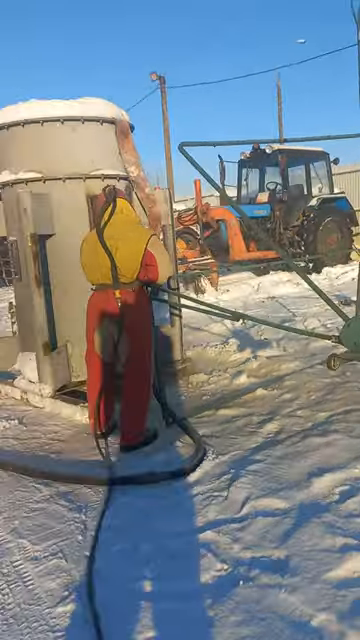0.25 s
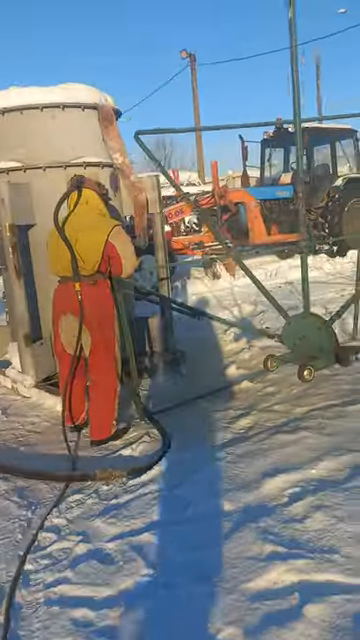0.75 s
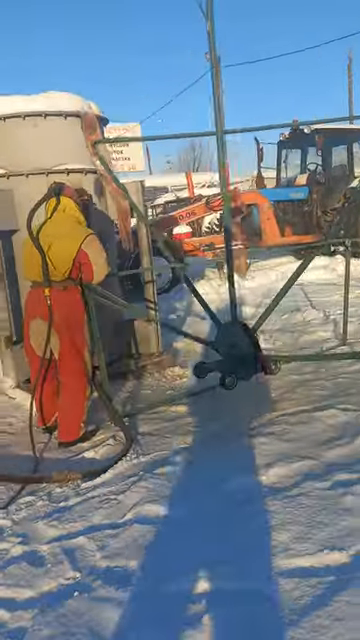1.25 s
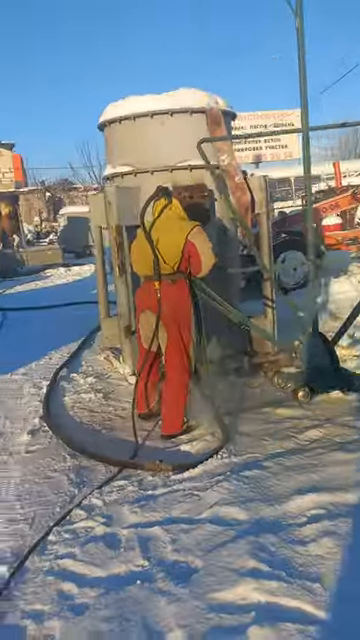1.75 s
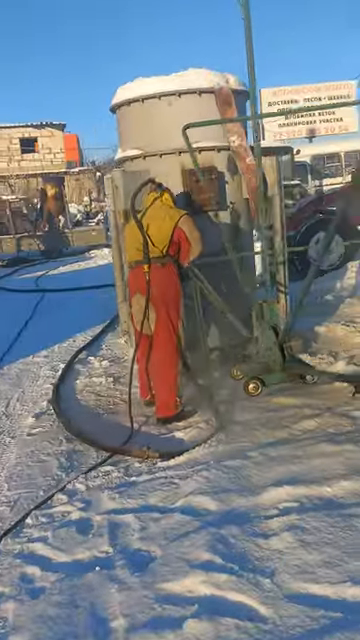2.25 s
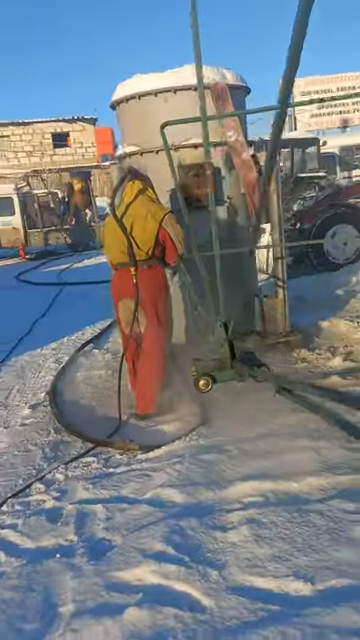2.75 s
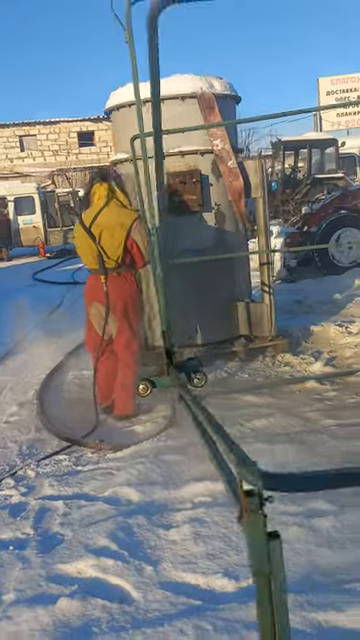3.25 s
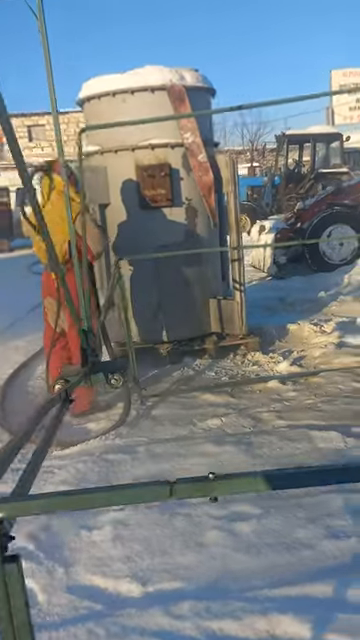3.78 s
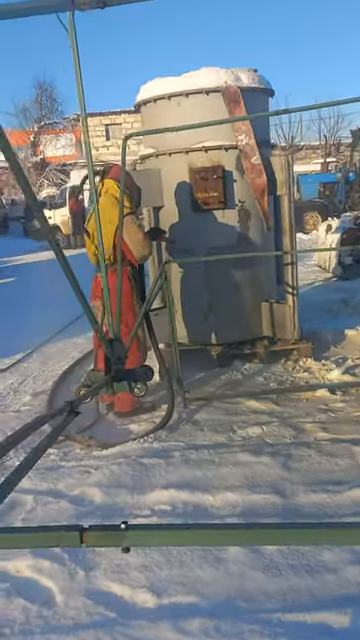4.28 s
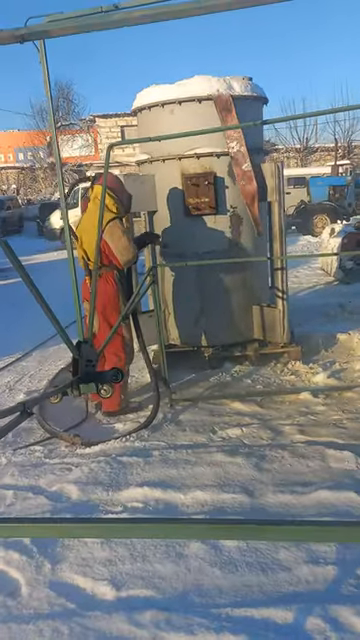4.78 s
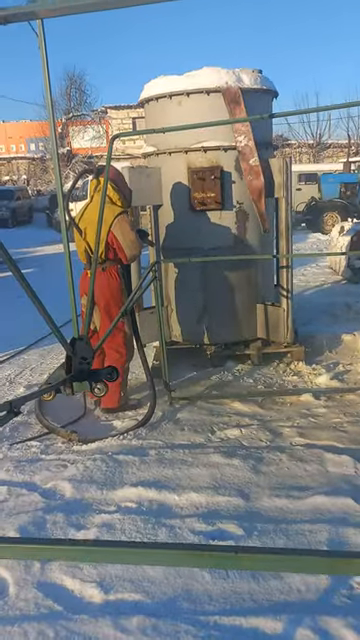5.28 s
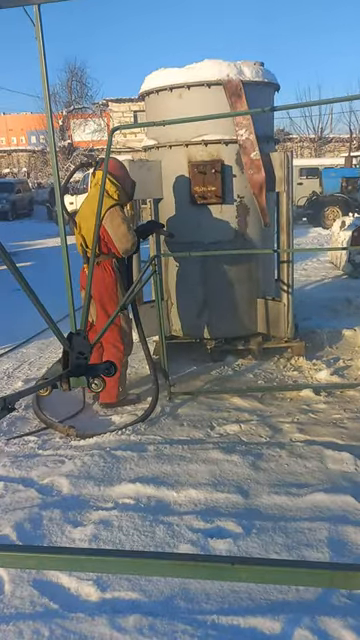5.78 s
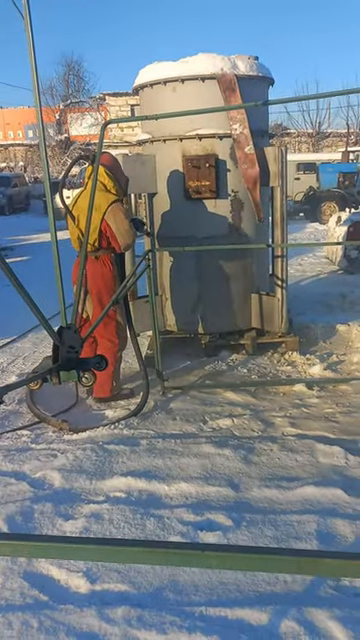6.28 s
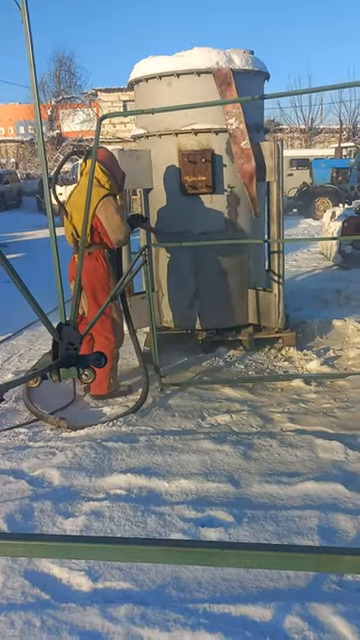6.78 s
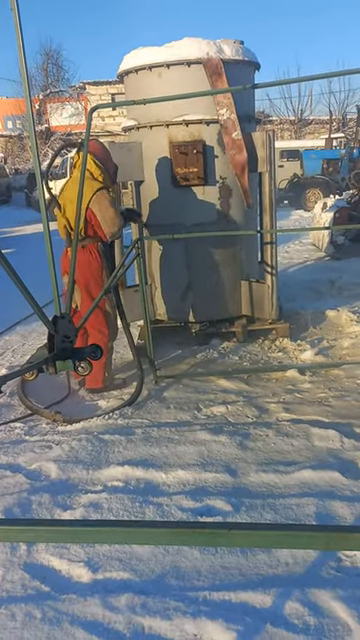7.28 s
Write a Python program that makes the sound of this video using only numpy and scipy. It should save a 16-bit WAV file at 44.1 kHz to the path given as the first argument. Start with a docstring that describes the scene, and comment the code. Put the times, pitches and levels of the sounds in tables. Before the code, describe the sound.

A few metres away in a snowy open yard, an abrasive blasting nozzle hisses loudly and continuously over a low compressor drone. One stroke roars on a steel tank; then the hiss dulls behind the worker's body while a deep hollow rush swells. The bright hiss and grit sizzle snap back, and three more roaring strokes follow. Stereo handheld microphone, close and fairly dry, with short echoes.

```python
"""A sandblaster works on a steel tank in a snowy yard, a few metres from a pair of microphone ports.
Throughout, a compressor engine drones as wavering harmonics over low noise, and shaped noise makes the air jet:
swept to and fro, it roars on a plate and hisses at its rims, while grit sizzles on the steel in uneven spurts.
The ground and the yard return short echoes. After the first stroke the worker's body dulls the jet, which
catches a hollow of the tank and swells into a low rush; then it comes back into view for three more strokes."""
import sys
import numpy as np
from scipy import signal
from scipy.fft import rfft, irfft
from scipy.io import wavfile
from scipy.ndimage import uniform_filter1d

SR = 44100
rng = np.random.default_rng(int(sys.argv[2]) if len(sys.argv) > 2 else 0)


def log_audio(samples):
    """Write samples as a 16-bit WAV file to the path given in sys.argv[1]."""
    # one column per channel
    frames = np.atleast_2d(samples).T
    # limit to full scale, then quantise
    limited = np.clip(frames, -1, 1)
    pcm = np.round(limited * 32767).astype(np.int16)
    wavfile.write(sys.argv[1], SR, pcm)


N = 332073
T = np.arange(N) / SR

# grid of the short-time spectra, lengths in samples
FRAME, HOP = 512, 128
HZ = np.fft.rfftfreq(FRAME, 1 / SR)
FRAME_S = np.arange(N // HOP + 5) * HOP / SR


def amp(db):
    """Level to amplitude: 20 dB is a factor of ten."""
    return 10 ** (np.asarray(db) / 20)


def unit(x):
    """Normalisation of the mean power: scales to rms 1."""
    return x / np.sqrt(np.mean(x ** 2) + 1e-20)


def read(points, hz):
    """A spectrum table, joined by straight lines over log frequency."""
    table_hz, value = np.transpose(points)
    return np.interp(np.log(hz + 1), np.log(table_hz + 1), value)


def follow(table, t, order):
    """One column of a time table at the times t, by linear interpolation."""
    rows = np.array(table)
    return np.interp(t, rows[:, 0], rows[:, order])


def per_frame(curve):
    """A control curve sampled as a column, one value for each short-time spectrum."""
    return np.interp(FRAME_S, T, curve)[:, None]


def wander(slow_hz, fast_hz):
    """Band-limited random fluctuation of rms 1, mostly between two rates."""
    f = np.fft.rfftfreq(N, 1 / SR) + 1e-6
    spectrum = rfft(rng.standard_normal(N))
    spectrum = spectrum / (1 + (slow_hz / f) ** 4) / (1 + (f / fast_hz) ** 4)
    return unit(irfft(spectrum, N))


def bump(s, length):
    """A Gaussian envelope of height 1 around the time s; its area is the length."""
    return np.exp(-np.pi * ((T - s) / length) ** 2)


def swell(start, rise, hold, fall):
    """A piecewise linear envelope of height 1: rise, hold, fall."""
    return np.interp(T - start, np.cumsum([0, rise, hold, fall]), [0, 1, 1, 0])


def low_noise(colour, spread):
    """Long waves reach both ports almost alike: a shared part of rms 1 and a small opposed part."""
    noise = rfft(rng.standard_normal((2, N)))
    mid, side = irfft(noise * amp(read(colour, np.fft.rfftfreq(N, 1 / SR))), N)
    return unit(mid) + spread * unit(side) * np.array([[1], [-1]])


def turbulence(colour_db, patchy_db, echo):
    """Interference of direct, ground-reflected and scattered noise at two ports; their mean has rms 1."""
    # path of the sound: time_s, ground_echo_lag_ms, direct_share_in_treble (0-1)
    path = [(0, 1.57, 0.4), (1.3, 1.54, 0.66), (2.0, 1.51, 0.34), (3.0, 1.45, 0.6), (3.6, 1.78, 1),
            (4.3, 1.95, 0.64), (7.53, 1.81, 0.34)]
    # coherence of the two ports below the treble: frequency_hz, direct_share (0-1)
    direct = [(100, 0.27), (600, 0.68), (1100, 0.9), (2200, 0.83), (3100, 0.24), (4000, 0.7), (5500, 0.35)]
    # level difference of the ports: frequency_hz, left_minus_right_db
    balance = [(550, 0.4), (900, 1), (1220, -6), (1750, -3), (2050, 0.3), (2350, 0.2), (3100, 5.8),
               (3650, 2.5), (4400, 6), (5300, 18.8), (6400, 22), (7700, 14), (10000, 17), (11500, 12.5),
               (15500, 12)]
    # phase difference of the ports: frequency_hz, left_lead_rad
    port_phase = [(100, 0.1), (650, 0.8), (1080, 0.3), (1350, 2.1), (1700, 2.1), (1900, 3.35), (2300, 3),
                  (2500, 4.8), (2900, 6.4), (3650, 9.5), (4900, 12), (6000, 11.4), (8000, 12.6),
                  (12000, 15), (16000, 18)]
    echo_skew = 0.026  # the ground echo reaches the two ports at slightly different lags

    shape = (len(FRAME_S), len(HZ))
    noise = rng.standard_normal((3, *shape)) + 1j * rng.standard_normal((3, *shape))
    patches = uniform_filter1d(rng.standard_normal(shape), size=30, axis=0)  # smooth over time
    patches = unit(uniform_filter1d(patches, size=4, axis=1))  # and over frequency

    lag_s = follow(path, FRAME_S, order=1)[:, None] / 1000
    lag_s = lag_s * (1 + echo_skew * np.array([1, -1])[:, None, None])
    # the ground echo combs the direct sound; snow reflects the low notes best
    reflection = echo / (1 + (HZ / 3300) ** 2)
    comb = abs(1 + reflection * np.exp(-2j * np.pi * HZ * lag_s))

    treble = np.clip((HZ - 3600) / 1800, 0, 1)
    treble_share = follow(path, FRAME_S, order=2)[:, None]
    share = np.clip((1 - treble) * read(direct, HZ) + treble * treble_share, 0, 1)
    # the direct noise is common to both ports, the scattered noise is not
    left, right = np.sqrt(share) * comb * noise[0] + np.sqrt(1 - share) * noise[1:]
    # in the treble the right port lies in the shadow of the case that holds it
    right = right * amp(-read(balance, HZ)) * np.exp(-1j * read(port_phase, HZ))

    spectra = np.array([left, right]) * amp(colour_db + patchy_db * patches)
    sound = signal.istft(spectra.transpose(0, 2, 1), nperseg=FRAME, noverlap=FRAME - HOP)[1][:, :N]
    return sound / sound.mean(0).std()


def compressor():
    """Periodic firing gives harmonics of one wavering rate; broadband noise adds a dull drone."""
    # lines of the engine: multiple_of_firing_rate, level_db
    orders = [(1, -69), (2, -46.5), (6, -63), (10, -61.5), (12, -55.5)]
    # spectrum of the drone: frequency_hz, relative_density_db (per Hz)
    drone_colour = [(20, -42), (34, -28), (45, -2.5), (65, -1.5), (90, 3), (130, 1), (220, -9),
                    (500, -26.5), (1500, -37)]
    firing_hz = 43.44  # mean rate

    turns = np.cumsum(firing_hz * (1 + 0.005 * wander(0.37, 5.4))) / SR
    lines = np.zeros(N)
    for multiple, level_db in orders:
        level = amp(level_db + 1.9 * wander(0.26, 3.6))
        lines += level * np.sin(2 * np.pi * (multiple * turns + rng.random()))
    drone_db = np.interp(T, [1, 4.5], [-41, -46])
    drone = low_noise(drone_colour, spread=0.13) * amp(drone_db)
    return np.sqrt(2) * lines + drone  # a sine of peak sqrt(2) has rms 1


def yard(x, wet_db, t60, drift_s, count=14):
    """Early reflections off tank, scaffold and machines; paths drift as nozzle and listener move."""
    delay_s = rng.uniform(.004, .04, count)
    gain = rng.choice([-1, 1], count) * amp(-60 * delay_s / t60)  # later echoes are weaker
    gain *= amp(wet_db) / np.linalg.norm(gain)
    sway_hz = rng.uniform(0.0989, .4, count)
    start = rng.random(count)
    out = x.copy()
    for d, g, rate, phase in zip(delay_s, gain, sway_hz, start):
        late = d + drift_s * np.sin(2 * np.pi * (rate * T + phase))
        out += g * np.array([np.interp(T - late, T, port) for port in x])
    return out / np.sqrt(1 + amp(wet_db) ** 2)


def deflected_air(flare_db):
    """Flow separation: the jet tumbles off the tank in a low rush, which opens up in the hollow."""
    # steady rush of air off the tank: time_s, level_db
    rush_bed = [(0, -42), (2.2, -43), (3.2, -45.5), (3.7, -51)]
    # swells of the deflected air: start_s, rise_s, hold_s, fall_s, level_db
    rush_swells = [(0.375, 0.093, .05, .55, -38), (1.42, 0.12, 0.057, 0.22, -41),
                   (2.137, 0.4, 0.37, .3, -29.5)]
    # spectrum of the rush: frequency_hz, relative_density_db (per Hz)
    rush_colour = [(40, -26), (90, -6), (150, 0.5), (250, 4), (350, 0.5), (480, -11), (800, -14),
                   (1500, -26.5), (4000, -35)]
    # the jet dips into the hollow: centre_s, length_s, level_db
    gulp = (2.646, 0.16, -29)
    # spectrum of the dip: frequency_hz, relative_density_db (per Hz)
    gulp_colour = [(200, -14), (420, 10), (520, 0.5), (700, -7), (1050, 2), (1400, -9), (2200, -20),
                   (5000, -44)]
    rush_follows = .7  # share of each hiss flare, in dB, that the steady rush takes on

    power = amp(follow(rush_bed, T, order=1) + rush_follows * flare_db) ** 2
    for start, rise, hold, fall, level_db in rush_swells:
        power = power + (amp(level_db) * swell(start, rise, hold, fall)) ** 2
    flutter = amp(.3 * wander(5.2, 25))
    rush = low_noise(rush_colour, spread=0.066) * np.sqrt(power) * flutter
    centre, length, level_db = gulp
    return rush + low_noise(gulp_colour, spread=0.3) * amp(level_db) * bump(centre, length)


def grit(feed):
    """Impact noise: countless grains strike steel in clusters; larger clumps flare and make an edge resonate."""
    # sizzle of the steady grit: time_s, level_db
    sizzle_level = [(0, -34), (.3, -34), (1.35, -30), (2.15, -31.8), (2.7, -29), (3.17, -35.5),
                    (3.38, -27.5), (3.8, -25), (7.53, -28.5)]
    # clumps of grit leaving the nozzle: centre_s, length_s, level_db, ringing_edge_level_db
    spurts = [(1.252, .05, -32, -46), (1.733, 0.081, -28, -47), (1.898, 0.06, -25, -33),
              (2.27, 0.016, -28, -38), (3.7, 0.051, -33, -33), (6.03, 0.032, -29, -44)]
    # spectrum of the sizzle: frequency_hz, relative_density_db (per Hz)
    grit_colour = [(2000, -10), (5500, -8), (7500, -34), (8500, -13), (9800, -8.5), (10600, 4), (11600, 3),
                   (13200, 7), (14500, 6.5), (16000, -0.5)]
    edge_hz, edge_half_width_hz = 10480, 120  # 6 dB down at the half width

    steady_db = follow(sizzle_level, T, order=1)
    power = amp(steady_db + 1.35 * feed) ** 2
    ring = amp(steady_db - 27 + 2.4 * feed)
    for centre, length, level_db, ring_db in spurts:
        power = power + (amp(level_db) * bump(centre, length)) ** 2
        ring = ring + amp(ring_db) * bump(centre, length)
    clusters = amp(.5 * wander(60, 1200))
    sizzle = turbulence(read(grit_colour, HZ), patchy_db=2.26, echo=0.22) * np.sqrt(power) * clusters
    edge_db = -20 * np.log10(1 + ((HZ - edge_hz) / edge_half_width_hz) ** 2)
    return sizzle + turbulence(edge_db, patchy_db=2, echo=0) * ring


def strokes():
    """Jet impingement: the plate strengthens the roar; at each rim the hiss flares and its gap tone bends."""
    # strokes across a steel plate: on_s, off_s, roar_gain_db, hiss_flare_on_db, hiss_flare_off_db
    stroke_table = [(0.617, 1.36, 5.5, 0, 1.5), (4.155, 5.017, 7, 3, 3), (5.61, 6.167, 6, 2, 4),
                    (6.827, 7.345, 5, 3, 3.5)]
    # the jet is wide: it roars before and after its centre is on the plate
    lead_s, rise_s, lag_s, fall_s = 0.11, 0.16, 0.052, 0.046
    rim_s = 0.32  # time the jet takes to cross the plate's rim
    # tone of the gap between nozzle and steel, and its bend per dB of flare going on and off
    gap_rest_hz, bend_on_hz_per_db, bend_off_hz_per_db = 5110, 89, -13

    plate_db, flare_on, flare_off = np.zeros((3, N))
    for on, off, gain_db, on_db, off_db in stroke_table:
        arrived = (1 + np.tanh((T - on + lead_s) / rise_s)) / 2
        gone = (1 + np.tanh((T - off - lag_s) / fall_s)) / 2
        plate_db += gain_db * arrived * (1 - gone)
        flare_on += on_db * bump(on, rim_s)
        flare_off += off_db * bump(off, rim_s)
    gap_hz = gap_rest_hz + bend_on_hz_per_db * flare_on + bend_off_hz_per_db * flare_off
    return plate_db, flare_on + flare_off, gap_hz


def air_jet(feed, plate_db, flare_db, gap_hz):
    """Jet noise scales with eddy size: large eddies roar, small ones hiss; both flutter with the grit feed."""
    # the worker's body hides the jet, then the listener steps round him: time_s, jet_level_db
    exposure = [(0, -3), (1.3, -1.5), (2.78, -9), (3.27, 0), (3.65, 0), (3.95, 1.2), (4.7, -.5), (5.9, 0),
                (6.45, -3), (6.9, 0.5), (7.53, -1.2)]
    # spectrum of the large eddies: frequency_hz, relative_density_db (per Hz)
    roar_colour = [(150, -8), (330, -14.5), (520, -1.5), (850, -4.5), (1100, 0.5), (1350, -1.5),
                   (1650, 0.5), (2050, 7.5), (2350, 2.5), (2850, 4), (3700, 3.5), (5000, -7), (8000, -19.5)]
    # spectrum of the small eddies: frequency_hz, relative_density_db (per Hz)
    hiss_colour = [(1000, -22), (2200, -14.5), (3200, -6.5), (4300, -4), (5200, -5), (5750, -0.5),
                   (6200, -1.5), (6800, -8.5), (7500, -18.5), (8400, -20), (10000, -14), (16000, -10.5)]
    roar_db, hiss_db = -32.5, -24  # in full view; the roar averaged over the strokes, the hiss without flare
    roar_follows = 0.15  # share of the exposure, in dB: the roar partly bends round the body
    plate_hz = 2330  # the plate reinforces the roar mostly below this

    view_db = follow(exposure, T, order=1)
    deepen_db = per_frame(plate_db - plate_db.mean()) / (1 + (HZ / plate_hz) ** 4)
    roar = turbulence(read(roar_colour, HZ) + deepen_db, patchy_db=1.32, echo=0.43)
    roar = roar * amp(roar_db + roar_follows * view_db + 0.49 * feed)

    gap_db = 5 * np.exp(-((HZ - per_frame(gap_hz)) / 800) ** 2)
    hiss = turbulence(read(hiss_colour, HZ) + gap_db, patchy_db=1.6, echo=0.34)
    flutter_db = 0.4 * feed + 0.21 * wander(7.2, 35)
    return roar + hiss * amp(hiss_db + view_db + flare_db + flutter_db)


def scene():
    """Superposition: jet and grit with their reflections, the deflected air and the engine."""
    feed = wander(2.8, 23)  # grit reaches the nozzle unevenly
    plate_db, flare_db, gap_hz = strokes()
    blast = air_jet(feed, plate_db, flare_db, gap_hz) + grit(feed)
    blast = yard(blast, wet_db=-12, t60=0.061, drift_s=0.000401)
    return blast + deflected_air(flare_db) + compressor()


def record(dry):
    """Band limitation: the microphone's low cut and a steep upper limit."""
    low_cut = signal.butter(4, 38, "highpass", fs=SR, output="sos")
    lean = signal.sosfilt(low_cut, dry)
    cut_hz = 15850
    taps = signal.firwin(801, cut_hz, window=("kaiser", 8), fs=SR)
    return signal.oaconvolve(lean, taps[None], "same", axes=1)


dry = scene()
out = record(dry)
log_audio(out)
```